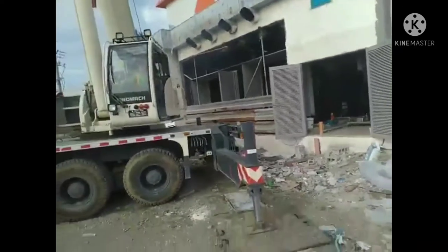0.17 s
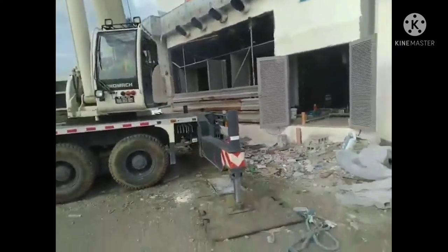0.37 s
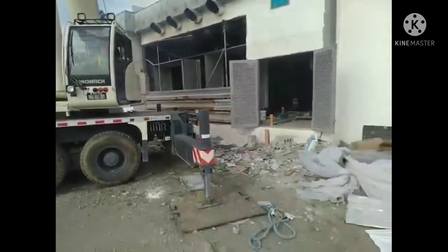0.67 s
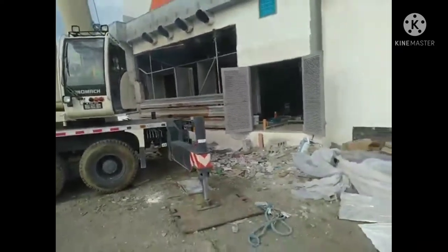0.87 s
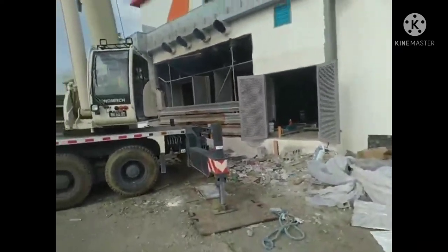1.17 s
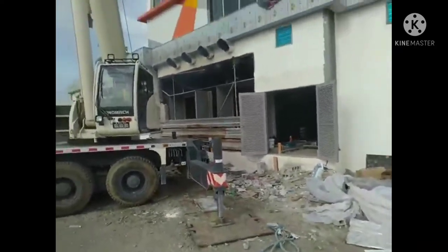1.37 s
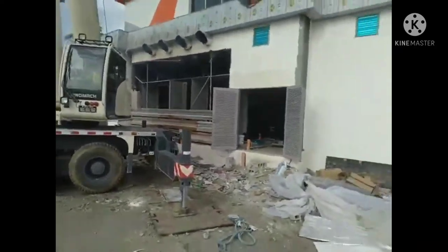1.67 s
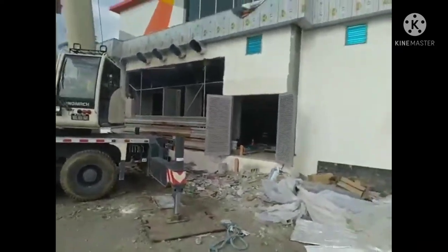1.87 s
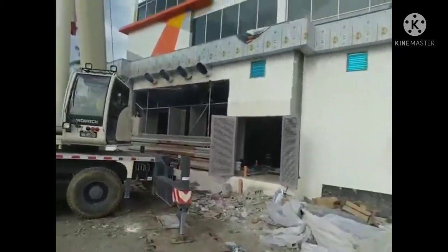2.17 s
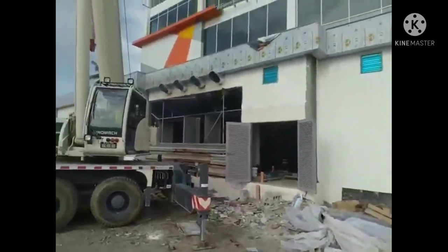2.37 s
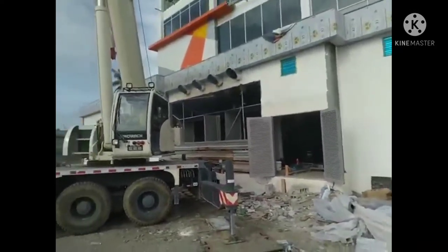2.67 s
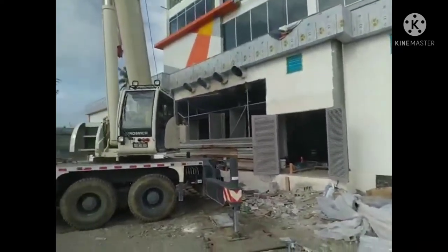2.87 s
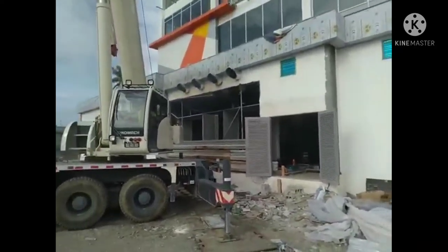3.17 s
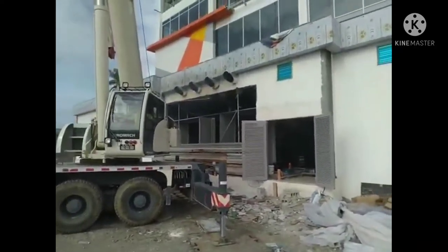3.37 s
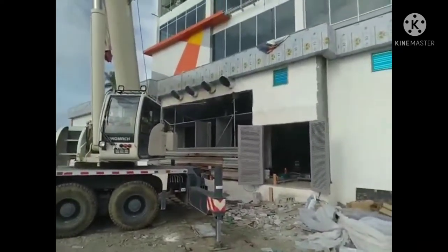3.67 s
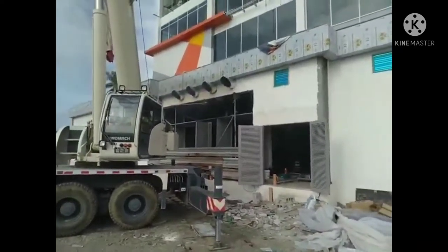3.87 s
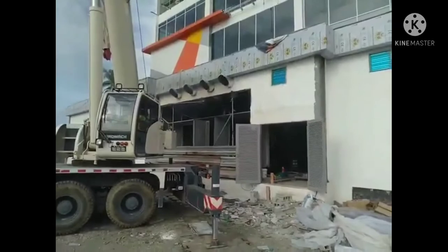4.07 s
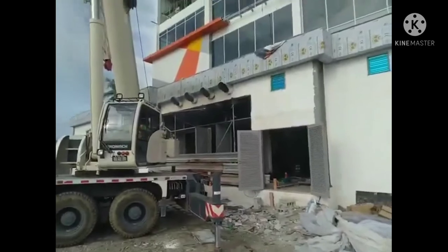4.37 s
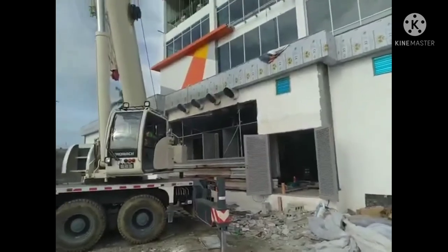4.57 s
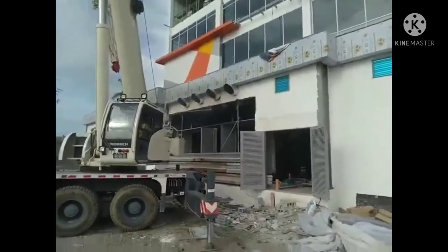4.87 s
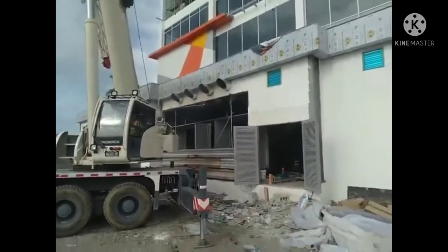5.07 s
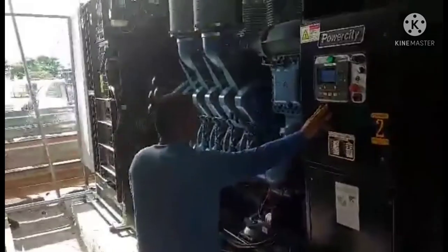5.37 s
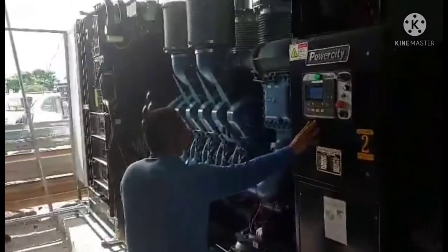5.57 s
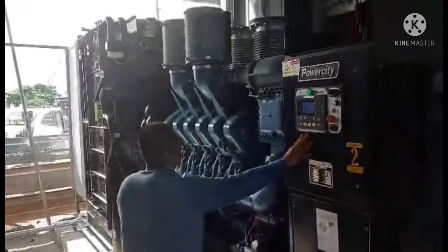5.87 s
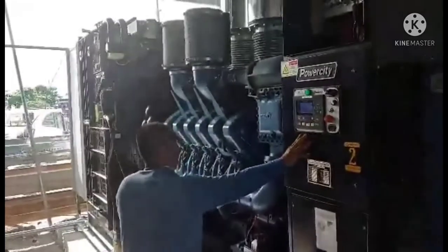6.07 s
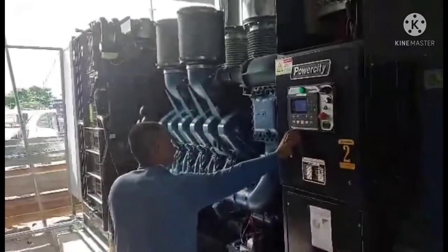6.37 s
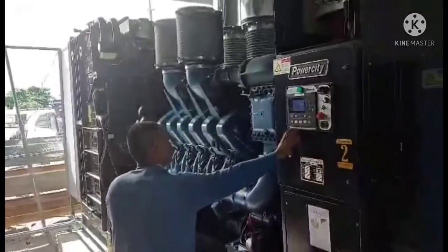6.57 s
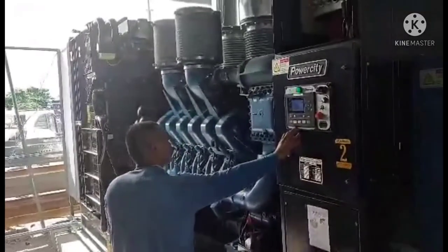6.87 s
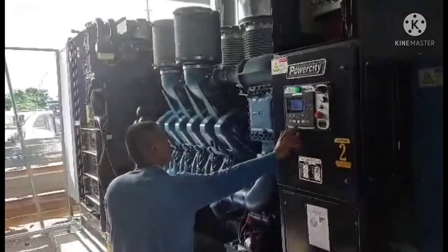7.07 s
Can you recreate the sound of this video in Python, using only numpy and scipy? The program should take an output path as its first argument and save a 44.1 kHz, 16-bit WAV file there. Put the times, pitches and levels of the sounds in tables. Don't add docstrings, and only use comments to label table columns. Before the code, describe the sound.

A big diesel generator drones steadily behind louvres in a yard, then cuts abruptly to a close, clattering engine in an engine room.

```python
import sys
import numpy as np
from scipy import signal
from scipy.fft import rfft, irfft, next_fast_len
from scipy.io import wavfile
from scipy.ndimage import uniform_filter1d, map_coordinates

SR = 44100
rng = np.random.default_rng(int(sys.argv[2]) if len(sys.argv) > 2 else 0)


def natural_amplitude(level_db):
    exponent = np.asarray(level_db, float) / 20
    return 10 ** exponent


def to_wav(sig):
    pcm = np.clip(np.atleast_2d(sig), -1, 1) * 32767
    pcm = np.round(pcm).astype(np.int16)
    wavfile.write(sys.argv[1], SR, pcm.T)


N = 318402
T = np.arange(N) / SR

# (multiple of the cycle [-], level [dB])
YARD_ORDERS = [(2, -54), (3, -40), (4, -29), (5, -35), (6, -26), (7, -35), (8, -27), (9, -17), (12, -38),
               (13, -33), (14, -27), (15, -30), (16, -32), (17, -38), (18, -41), (20, -36), (21, -28),
               (22, -38), (26, -41), (30, -39), (31, -40), (32, -40), (35, -40), (64, -49), (72, -51),
               (76, -52), (88, -53), (113, -55), (133, -57), (143, -54)]
# (multiple of blade rate [-], level [dB])
FAN_ORDERS = [(1, -25), (2, -39), (3, -45)]
# (frequency [Hz], density [dB per Hz])
YARD_ROAR = [(28, -64.5), (45, -61), (65, -51), (95, -51.5), (140, -40), (180, -47), (260, -48),
             (320, -45.5), (370, -45.5), (420, -51.5), (500, -48), (600, -53), (700, -53.5), (820, -57)]
YARD_CLATTER = [(1000, -55), (1200, -59.5), (1400, -63.5), (1700, -60.5), (1860, -64), (2150, -62.5),
                (3050, -69), (3400, -74), (4500, -78.5), (6000, -88.5), (6900, -92), (7800, -104),
                (9500, -93.5), (12500, -97.5)]
# (frequency [Hz], share [0-1])
YARD_REPEAT = [(300, 0.084), (1000, 0.086), (2000, .15), (3500, 0.018)]
# (frequency [Hz], correlation [-1 to 1])
YARD_ALIKE = [(60, .997), (130, 1.0), (280, 0.992), (600, 0.975), (1280, 0.72), (2750, 0.3), (5900, 0.0),
              (12700, 0.01)]
# (frequency [Hz], left minus right [dB])
YARD_SIDE = [(60, 0.0), (110, 0.0), (200, 0.0), (360, 0.5), (650, 0.0), (1170, 1.0), (2130, 5.5),
             (3860, 4.5), (7000, 6.0), (12700, 4.0)]
# (multiple of the cycle [-], level [dB])
ROOM_ORDERS = [(16, -27), (17, -25), (18, -21), (36, -23), (42, -29), (45, -30), (48, -24), (49, -27),
               (51, -34), (58, -33), (63, -36), (67, -35), (72, -34), (76, -31), (81, -37), (90, -37),
               (108, -36), (110, -36), (121, -38), (123, -38), (126, -32), (141, -39), (160, -38),
               (162, -39), (163, -39), (166, -38), (174, -38), (175, -40), (198, -41), (297, -42)]
LOW_ORDERS = [(6, -39.5), (9, -40), (10, -35), (13, -33)]
# (frequency [Hz], density [dB per Hz])
ROOM_ROAR = [(28, -58), (45, -56), (70, -45.5), (110, -36.5), (150, -40.5), (200, -43.5), (260, -44),
             (320, -42), (370, -48), (420, -47), (550, -47), (750, -49.5), (950, -50), (1200, -50)]
ROOM_CLATTER = [(1350, -49), (1600, -58.5), (1950, -49.5), (2250, -55.5), (2580, -52), (2900, -58.5),
                (3500, -61), (4200, -60), (4800, -66), (6300, -66.5), (7000, -67.5), (8000, -68),
                (11500, -70.5), (12600, -78.5)]
# (frequency [Hz], share [0-1])
ROOM_REPEAT = [(40, .1), (120, .15), (300, .45), (450, .8), (1300, .76), (2000, .55), (2500, .15),
               (4000, .03)]
# (frequency [Hz], correlation [-1 to 1])
ROOM_ALIKE = [(60, 0.78), (130, 1), (280, 0.99), (600, 0.72), (1280, 0.018), (2750, 0.082), (5900, -0.01),
              (12700, -0.03)]
# (frequency [Hz], left minus right [dB])
ROOM_SIDE = [(60, 4), (110, 2), (200, 6.5), (360, 0), (650, 3.5), (1170, 4.5), (2130, 0), (3860, -0.5),
             (7000, -2), (12700, 3)]
# (time [s], frequency [Hz], half length [s], level [dB])
CHAIN_SQUEAKS = [
    (2.1, 4250, .05, -56),
    (2.24, 6050, .07, -54),
]
# (time [s], frequency [Hz], half length [s], level [dB])
COVER_RATTLES = [
    (5.66, 2600, 0.091, -29),
    (6.046, 2650, 0.064, -23),
    (6.36, 2480, .05, -35),
    (6.65, 2560, .05, -27),
    (6.76, 2380, .03, -26),
]
# (time [s], level [dB])
DRONE = [
    (0.0, -19.5),
    (0.4, -20),
    (1.88, -15.5),
    (4.39, -16.5),
    (5.55, -18.5),
]
# (time [s], level [dB], half length [s])
GUSTS = [
    (5.55, -8, 0.018),
    (6.233, -16, 0.049),
    (6.4, -19, .09),
    (6.802, -25, .09),
]
# (frequency [Hz], share lost in the yard [0-1], share lost in the room [0-1])
EMPTY_PATCHES = [(3200, 0, .04), (3500, .3, .13), (6000, .2, .12), (6800, .3, .16), (7300, .78, .14),
                 (8200, .82, .1), (8900, .35, .11), (10000, .12, .1), (11500, .18, .11), (12300, .4, .14),
                 (12800, .72, .55), (13300, .96, .96)]

YARD_CYCLE_HZ, ROOM_CYCLE_HZ = 15.0, 20 / 3
FAN_HZ, GEAR_HZ = 192.15, 1160.5
WALK_M_S, WALK_ENDS_S, STOPPING_S = .9, 1.5, .4
CREST_DB = -16.5
ROAR_DB, LOUVRE_DB, CLATTER_DB = -2, -1, 0
ROAR_PER_DB, LOUVRE_PER_DB, CLATTER_PER_DB = -.8, -.5, -.5
GEAR_DB, GEAR_DB_PER_S = -36.5, -1.4
DOOR_HZ, TURNED_HZ, DOOR_HZ_PER_S, DOOR_DB, DOOR_WIDTH_HZ = 500, 664.7, 12, -30.5, 110
TURN_S, TURN_LENGTH_S = 2.0, .8
VALVE_S, VALVE_DB, VALVE_DECAY_CYCLES = 5.623, 3.5, 0.34
DRAUGHT_DB = -35.5
PREVIEW_S, PREVIEW_DB, ROOM_FULL_S = 5.445, -11.5, 5.53
YARD_GONE_S, RAMP_S = 5.6, 0.032
OVERLAP_DB = -1


def at(table, hz):
    f, v = np.transpose(table)
    return np.interp(np.log(np.maximum(hz, 1)), np.log(f), v)


def ramp(t, end_s, length_s):
    return np.clip(1 + (t - end_s) / length_s, 0, 1)


def walk(rate_hz, size):
    k = int(SR / rate_hz)
    held = np.repeat(rng.standard_normal(size // k + 1), k)
    return 1.45 * uniform_filter1d(uniform_filter1d(held, k), k)[:size]


def band_noise(shape, low_hz, high_hz):
    sos = signal.butter(2, [low_hz, high_hz], "band", fs=SR, output="sos")
    band = signal.sosfilt(sos, rng.standard_normal(shape))
    return band / band.std()


def ports(size, power, alike, side):
    hz = np.arange(size // 2 + 1) * SR / size
    one, other = rfft(rng.standard_normal((2, size)))
    c = np.clip(at(alike, hz), 0, 1)
    lean = natural_amplitude(at(side, hz) / 2)
    pair = np.array([one * lean, (c * one + np.sqrt(1 - c ** 2) * other) / lean])
    return hz, pair * np.sqrt(power(hz) * SR / 2)


def draught(t):
    level = natural_amplitude(DRAUGHT_DB) + sum(natural_amplitude(db) * np.exp(-np.abs(t - s) / half_s) for s, db, half_s in GUSTS)
    rumble = band_noise(len(t), 55, 160) * level * natural_amplitude(1.1 * walk(31, len(t)))
    return rumble * natural_amplitude(np.array([[1.2], [-1.2]]))


def doorway(t):
    turned = ramp(t, TURN_S + TURN_LENGTH_S, TURN_LENGTH_S)
    hz = DOOR_HZ + DOOR_HZ_PER_S * t + (TURNED_HZ - DOOR_HZ) * turned
    sos = signal.butter(2, DOOR_WIDTH_HZ / 2, fs=SR, output="sos")
    a, b = signal.sosfilt(sos, rng.standard_normal((2, len(t))))
    phase = 2 * np.pi * np.cumsum(hz) / SR
    return natural_amplitude(DOOR_DB) * (a * np.cos(phase) + b * np.sin(phase)) / a.std()


def squeaks(t, events):
    out = 0
    for s, hz, half_s, db in events:
        band = band_noise((2, len(t)), .96 * hz, 1.04 * hz)
        out = out + natural_amplitude(db) * band * np.exp(-((t - s) / half_s) ** 4)
    return out


def repeat_share(repeat, hz):
    return np.clip(at(repeat, hz), 0, 1) * (hz < 5000)


def roar(size, colour, repeat, alike, side, gain_db, flicker_db):
    long = next_fast_len(size)
    power = lambda hz: natural_amplitude(2 * at(colour, hz)) * (1 - repeat_share(repeat, hz))
    hz, fresh = ports(long, power, alike, side)
    octave = np.log2(np.maximum(hz, 1) / 30)
    out = 0
    for k in range(10):
        skirt = np.cos(np.pi / 2 * np.clip(octave - k, -1, 1))
        band = irfft(fresh * skirt, long)[:, :size]
        level_db = gain_db(30 * 2 ** k) + flicker_db * walk(12, size)
        out = out + band * natural_amplitude(level_db - 2.5)
    return out


def clatter(cycles, cycle_hz, lines, colour, repeat, alike, side, gain_db):
    size = int(round(SR / cycle_hz))
    power = lambda hz: natural_amplitude(2 * at(colour, hz)) * repeat_share(repeat, hz)
    pattern = ports(size, power, alike, side)[1]
    pattern[:, [int(k) for k, _ in lines]] = 0
    place = cycles * size % size
    loops = [map_coordinates(c, [place], order=2, mode="grid-wrap") for c in irfft(pattern, size)]
    return natural_amplitude(gain_db(1000)) * np.array(loops)


def orders(cycles, table, waver_db, alike, side, hz):
    out = 0
    for k, db in table:
        start = rng.uniform(0, 2 * np.pi)
        lag = rng.choice([-1, 1]) * np.arccos(np.clip(at(alike, k * hz), 0, 1))
        lean = natural_amplitude(at(side, k * hz) / 2)
        size = np.sqrt(2) * natural_amplitude(db + waver_db * walk(4, len(cycles))) / np.cos(lag / 2)
        phase = 2 * np.pi * k * cycles + start
        out = out + size * np.array([lean * np.sin(phase), np.sin(phase + lag) / lean])
    return out


def yard():
    t = T[T < 5.6]
    pair = YARD_ALIKE, YARD_SIDE
    drone_db = np.interp(t, *np.transpose(DRONE))
    swell_db = drone_db - CREST_DB
    speed_m_s = WALK_M_S * (1 - ramp(t, WALK_ENDS_S + STOPPING_S, STOPPING_S))
    heard_s = np.cumsum(1 - speed_m_s / 343) / SR
    cycles = YARD_CYCLE_HZ * heard_s + 0.0017 * walk(1.513, len(t))
    throb_db = .55 * np.cos(2 * np.pi * cycles)

    def gain_db(hz):
        if hz < 400:
            return ROAR_DB + ROAR_PER_DB * swell_db
        if hz < 700:
            return LOUVRE_DB + LOUVRE_PER_DB * swell_db + throb_db
        return CLATTER_DB + CLATTER_PER_DB * swell_db + throb_db

    colour = YARD_ROAR + YARD_CLATTER
    out = doorway(t) + squeaks(t, CHAIN_SQUEAKS)
    out += roar(len(t), colour, YARD_REPEAT, *pair, gain_db, 0.75)
    out += clatter(cycles, YARD_CYCLE_HZ, YARD_ORDERS, colour, YARD_REPEAT, *pair, gain_db)
    out += orders(FAN_HZ * heard_s + 0.043 * walk(2, len(t)), FAN_ORDERS, 1.4, *pair, FAN_HZ)
    whine = orders(GEAR_HZ * heard_s + 0.16 * walk(4, len(t)), [(1, 0)], 0.88, *pair, GEAR_HZ)
    out += natural_amplitude(GEAR_DB + GEAR_DB_PER_S * t) * whine
    steady = [row for row in YARD_ORDERS if row[0] not in (8, 9, 14, 15, 64)]
    out += orders(cycles, steady, 1.0, *pair, YARD_CYCLE_HZ)
    neighbours = [(8, -28.0), (14, -27.0), (15, -31), (64, -47)]
    out += natural_amplitude(-.7 * swell_db) * orders(cycles, neighbours, 0.86, *pair, YARD_CYCLE_HZ)
    out += natural_amplitude(drone_db) * orders(cycles, [(9, -0.67)], 0.12, *pair, YARD_CYCLE_HZ)
    return np.array([np.roll(out[0], 4), out[1]])


def engine_room():
    t = T[T >= 5.4]
    pair = ROOM_ALIKE, ROOM_SIDE
    cycles = ROOM_CYCLE_HZ * (t - VALVE_S) + 0.00067 * walk(3.64, len(t))
    puff_db = VALVE_DB * (np.exp(-(cycles % 1) / VALVE_DECAY_CYCLES) - .4)
    gain_db = lambda hz: puff_db * (hz > 3000)
    colour = ROOM_ROAR + ROOM_CLATTER
    out = draught(t) + squeaks(t, COVER_RATTLES)
    out += roar(len(t), colour, ROOM_REPEAT, *pair, gain_db, 0.78)
    out += clatter(cycles, ROOM_CYCLE_HZ, ROOM_ORDERS, colour, ROOM_REPEAT, *pair, gain_db)
    out += orders(cycles, ROOM_ORDERS + LOW_ORDERS, 0.52, *pair, ROOM_CYCLE_HZ)
    return out


def scene():
    out, far, near = np.zeros((2, N)), yard(), engine_room()
    out[:, :far.shape[1]] += far
    out *= 1 - ramp(T, YARD_GONE_S, RAMP_S)
    soft = natural_amplitude(PREVIEW_DB)
    enter = soft * ramp(T, PREVIEW_S, RAMP_S) + (1 - soft) * ramp(T, ROOM_FULL_S, RAMP_S)
    enter *= natural_amplitude(OVERLAP_DB * (1 - ramp(T, YARD_GONE_S + RAMP_S, RAMP_S)))
    first = N - near.shape[1]
    out[:, first:] += near * enter[first:]
    return out


def treble_dropouts(x, hop=1024, start=530, cell=4):
    n, k = np.arange(2 * hop), np.arange(hop // 8, 5 * hop // 8)
    window = np.sin(np.pi * (n + .5) / (2 * hop))
    basis = window * np.cos(np.pi / hop * (n + .5 + hop / 2) * (k[:, None] + .5))
    count = N // hop + 3
    lead = 2 * hop - start
    padded = np.pad(x, ((0, 0), (lead, (count + 1) * hop - N - lead)))
    halves = padded.reshape(2, count + 1, hop)
    coef = np.concatenate([halves[:, :-1], halves[:, 1:]], axis=2) @ basis.T
    wide, fine = rng.standard_normal((2, count, len(k) // cell))
    wide = uniform_filter1d(uniform_filter1d(wide, size=4, axis=0), size=3, axis=1)
    chance = wide / wide.std() * .8 + fine * .6
    chance = 1 / (1 + np.exp(-1.7 * np.repeat(chance, cell, axis=1)))
    hz, far, near = np.transpose(EMPTY_PATCHES)
    line_hz = k * SR / 2 / hop
    inside = ((np.arange(count) - 1) * hop + start) / SR > 5.43
    share = np.where(inside[:, None], np.interp(line_hz, hz, near), np.interp(line_hz, hz, far))
    change = (chance > share) / np.sqrt(1 - np.minimum(share, .8)) - 1
    frames = (coef * change) @ basis * 2 / hop
    out = np.pad(frames[:, :, :hop], ((0, 0), (0, 1), (0, 0)))
    out += np.pad(frames[:, :, hop:], ((0, 0), (1, 0), (0, 0)))
    return x + out.reshape(2, -1)[:, lead:][:, :N]


def band_limit(x):
    return signal.sosfilt(signal.butter(12, 13280, fs=SR, output="sos"), x)


def record(dry):
    rounded = np.clip(np.tanh(0.76 * dry) / 0.74, -1, 1)
    mix = treble_dropouts(rounded)
    return band_limit(mix)


dry = scene()
out = record(dry)
to_wav(out)
```